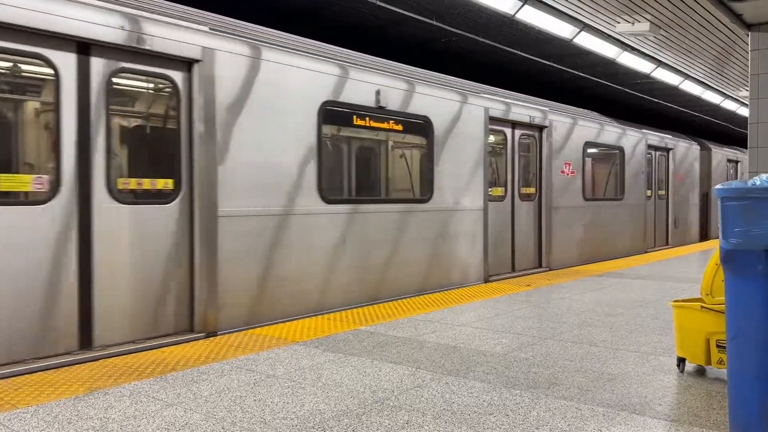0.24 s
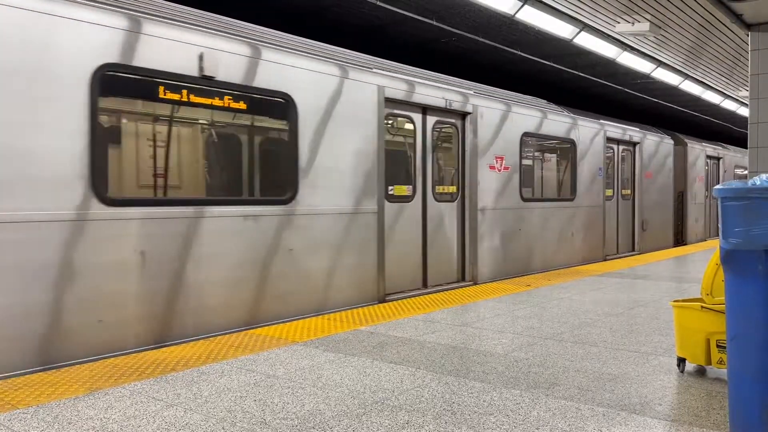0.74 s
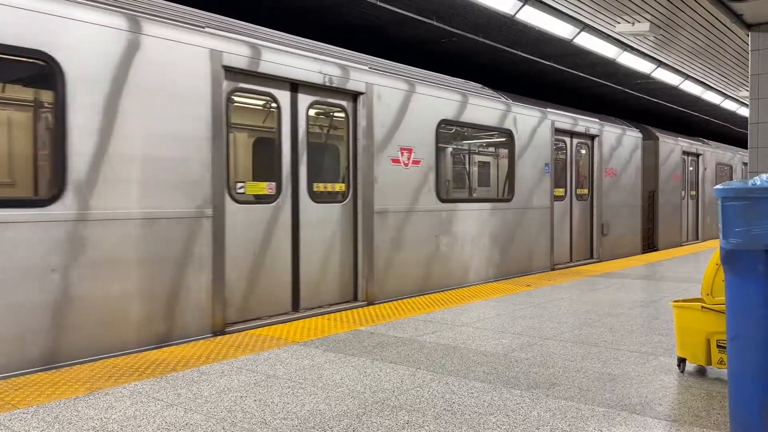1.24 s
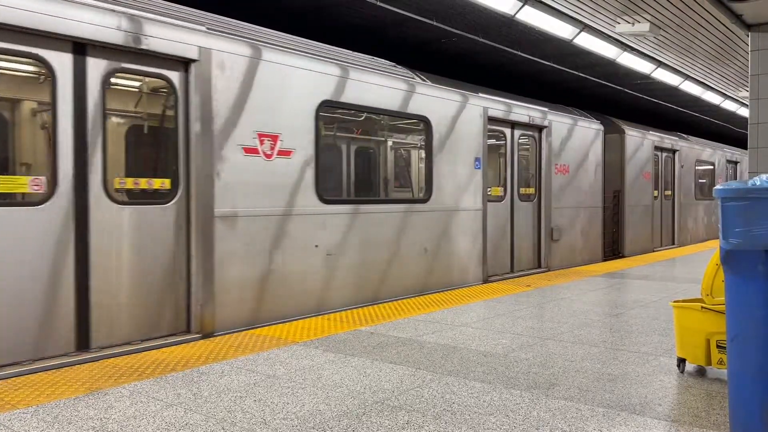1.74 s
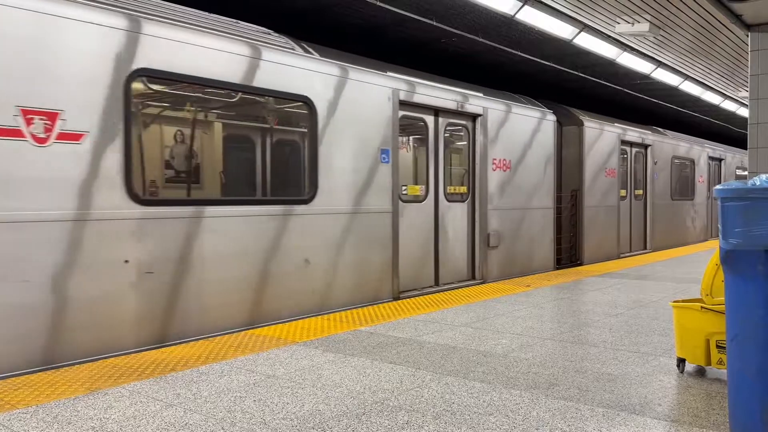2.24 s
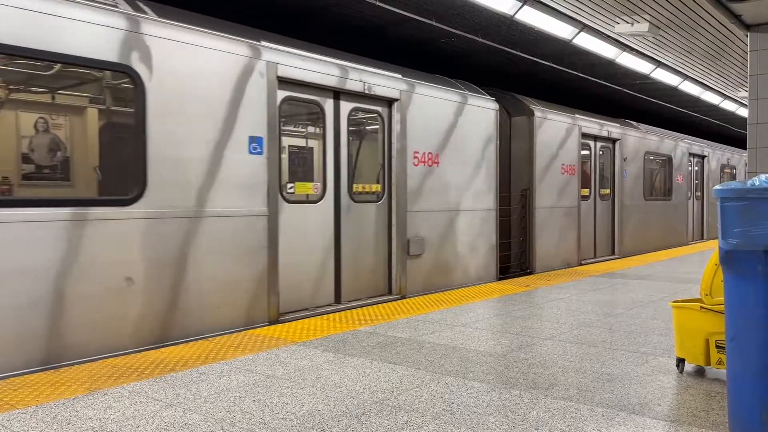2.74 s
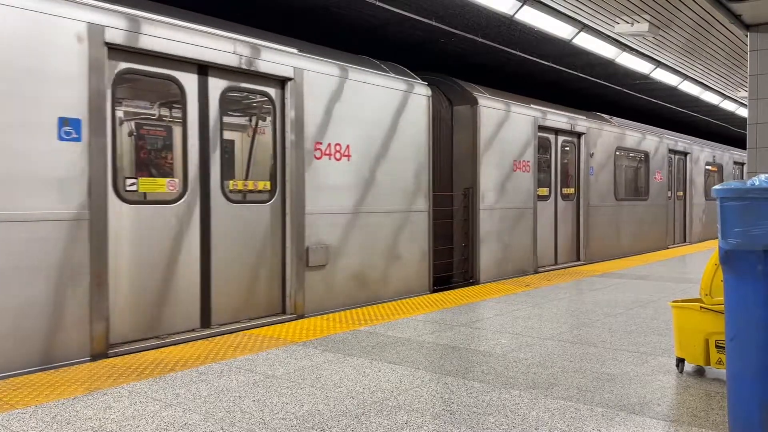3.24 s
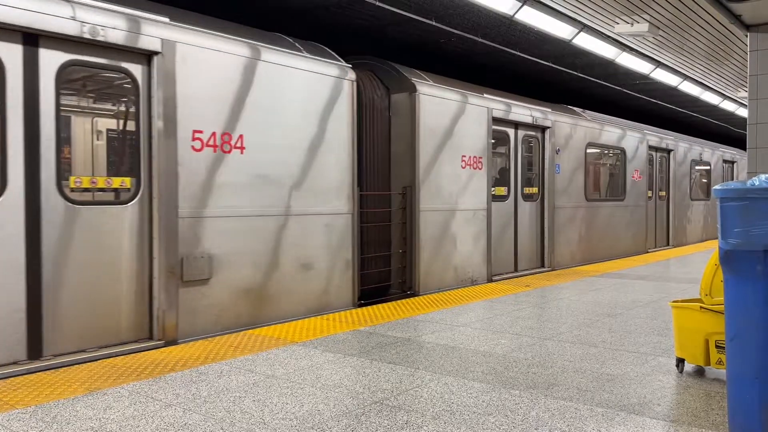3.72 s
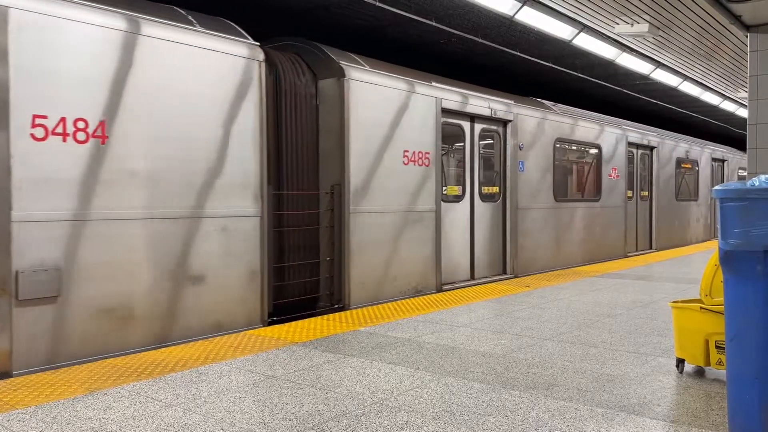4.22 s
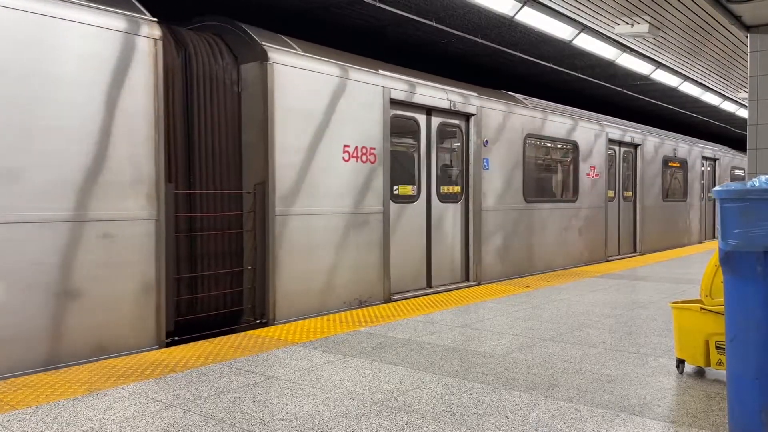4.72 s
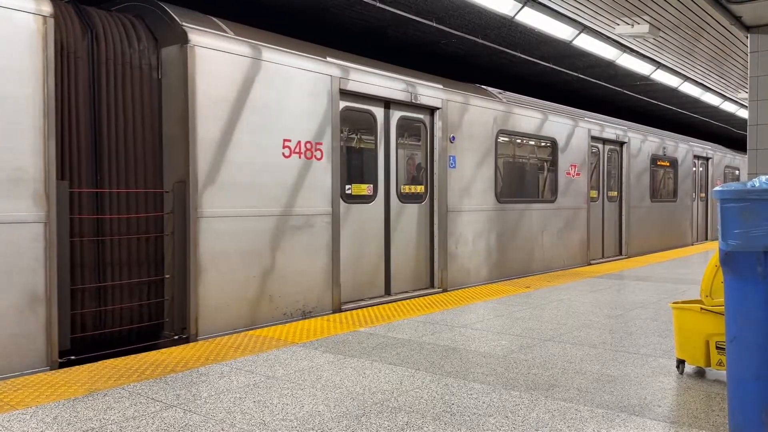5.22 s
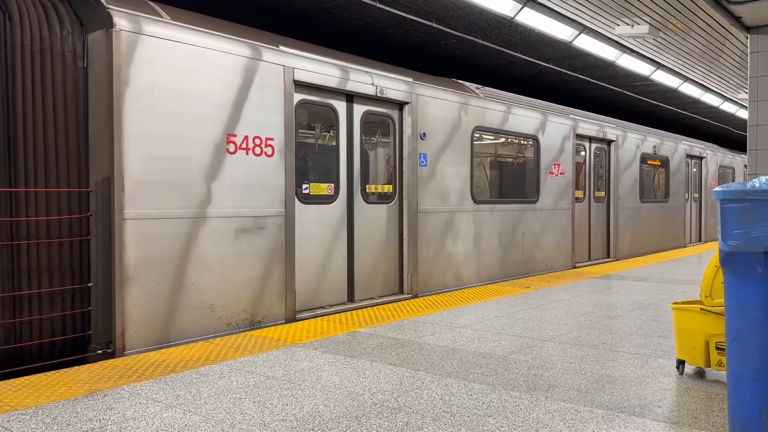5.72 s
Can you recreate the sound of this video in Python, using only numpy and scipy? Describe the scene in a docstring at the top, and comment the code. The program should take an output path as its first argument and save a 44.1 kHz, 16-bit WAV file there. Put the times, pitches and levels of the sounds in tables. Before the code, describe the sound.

A subway train brakes beside an underground platform, heard in wide stereo from a fixed spot close to the cars, with a short hard echo. From 0 s, deep rumble, hum and wheel roar dominate, with brief bass booms as the cars lurch, notably around 0.15, 1.1 and 1.9 s. A pulsing, unsteady electric motor whine cuts out soon after 1 s; a narrow groan swells near 0.9 s. Very high, thin brake squeals waver throughout, joined by a brighter one around 1.8-2.5 s, with short chirps near 2.4 and 3.7 s. After 2.7 s squealing becomes weaker and intermittent, with shrill spells around 3 and after 5 s. Small air puffs begin at 1.5 s and thicken after 4.2 s. A metallic gangway knock comes at 4.16 s, a softer rub swells near 5.7 s. A hollow blower drone rises unevenly late, over faint steady whistles. Rolling noise keeps sinking but never stops by 6 s.

```python
"""Subway train braking at a platform

A train slows evenly to about a third of its speed, and its shaped rolling noise and bass booms sink.
The brakes squeal in thin, wandering tones (sines with overtones) that the station echoes smear.
The traction whine, a cluster of unsteady sines, cuts out after about a second. The gangway between
two cars knocks once and later rubs: noise and ringing plates. A groan, a blower drone, puffs of air
(all shaped noise) and the steady whistles of the converter (sines) join in."""
import sys
import numpy as np
from scipy import signal
from scipy.fft import rfft, irfft, next_fast_len
from scipy.io import wavfile
from scipy.ndimage import uniform_filter1d

SR = 44100
rng = np.random.default_rng(int(sys.argv[2]) if len(sys.argv) > 2 else 0)


def wrap_up_sound(samples):
    """Save the sound to the file named by the first command line argument, as 16-bit audio."""
    columns = np.atleast_2d(samples).T
    # keep every value between -1 and 1, then stretch to whole-number steps
    tamed = np.clip(columns, -1, 1)
    steps = np.round(tamed * 32767).astype(np.int16)
    wavfile.write(sys.argv[1], SR, steps)


N = 263277
TIME = np.arange(N) / SR

STOP_S = 8.85  # the evenly falling speed would reach zero here, after the scene ends
STATION_T60_S = 0.7  # time for the echoes to fall by 60 dB
TRAIN_LAG_S = 0.00043  # sound running along the train reaches the right ear this much later
CUTOFF_HZ = 15750
GROAN_S, GROAN_DB = 0.93, -33.5
LURCH_RISE_DB_PER_S, LURCH_FALL_DB_PER_S = 161, 112
CONVERTER_GROWTH_DB_PER_S = 2.26
CHIRP_RISE_DB_PER_S, OTHER_BOGIE_LEFT_DB = 263, 4
EARS = np.array([[1], [-1]])  # signs for left and right

# Width of the sound field: (frequency [Hz], side minus mid [dB])
WIDTH = [(30, -44), (70, -26), (140, -13.5), (280, -10), (550, -3.5), (1000, 1), (2000, -2), (4500, 0),
         (9000, 6.5), (11500, -30)]
# Balance of the sound field: (frequency [Hz], left minus right [dB])
LEAN = [(60, 1), (400, -0.5), (560, 2.5), (800, 3.5), (1100, 4), (1500, 1), (2500, -1.5), (4500, 0),
        (8000, 1.5)]

# Steady converter tones, level at the end: (frequency [Hz], level [dB])
CONVERTER = [(4000, -59), (5000, -57.5), (7000, -83), (8000, -76), (9000, -75), (9998, -83.5)]
# Colour of the steady air hiss: (frequency [Hz], relative level per Hz [dB])
AIR_HISS = [(5000, -11), (8000, -5), (9500, 4.5), (11500, 8), (13000, -45), (15500, -13)]
# Colour of the valve puffs: (frequency [Hz], relative level per Hz [dB])
PUFF = [(7000, -10.5), (8300, -11.5), (9300, -2.5), (10500, -1), (12000, -15), (13500, -14), (15500, -32)]
# Colour of the puffs' top octave: (frequency [Hz], relative level per Hz [dB])
PUFF_TOP = [(10000, -16), (12200, 2), (14000, -4), (15700, -10)]
# Level of that top octave against the rest: (time [s], relative level [dB])
PUFF_TOP_DB = [(2.5, 6), (4.2, -3), (5.9, -0.5)]
# Air puffs from the brake valves: (start [s], relative level [dB], length [s])
PUFFS = [(1.48, -59.5, 0.05), (1.726, -60.5, .05), (1.965, -66, 0.054), (2.207, -62, 0.066),
         (2.38, -58.5, .054), (2.687, -64, 0.067), (3.083, -65, 0.053), (4.26, -59, 0.039),
         (4.371, -59, .14), (4.661, -58.5, 0.096), (4.956, -58, .039), (5.195, -59, 0.095),
         (5.637, -58, .12), (5.9, -58.5, 0.059)]
# Colour of the undercar blowers: (frequency [Hz], relative level per Hz [dB])
BLOWER = [(215, -18), (262, 6), (310, -7.5), (360, -5.5), (400, 3), (470, -7), (510, 5.5), (560, -17.5),
          (800, -15.5), (1000, -10), (1150, -24), (1400, -18)]
# Blower loudness: (time [s], level [dB])
BLOWER_DB = [(0, -67), (3.5, -59), (4.2, -44.5), (4.65, -47), (4.95, -57), (5.3, -43.5), (5.55, -41.5),
             (5.97, -50.5)]

# Colour of the booming car bodies: (frequency [Hz], relative level per Hz [dB])
BOOM = [(18, -30), (29, -8.5), (36, -21), (44, 6), (51, -22), (60, 5), (70, 3), (79, -9.5), (100, -39)]
# Colour of the underframe hum: (frequency [Hz], relative level per Hz [dB])
HUM = [(60, -38), (79, -10), (94, 2.5), (108, -2), (122, -4), (135, -7.5), (175, -49)]
# Colour of the wheel roar: (frequency [Hz], relative level per Hz [dB])
ROAR = [(100, -68), (137, 1), (160, 1), (180, -1.5), (205, 0.5), (235, -3), (255, -1.5), (295, -5.5),
        (355, -2.5), (420, -5), (490, -9.5), (620, -45)]
# Colour of the rail rush: (frequency [Hz], relative level per Hz [dB])
RUSH = [(380, -33), (510, 1.5), (680, 0), (738, -1), (790, 0), (900, -3), (1000, -6.5), (1150, -3),
        (1280, -12), (1600, -25)]
# Colour of the rubbing brake pads: (frequency [Hz], relative level per Hz [dB])
PAD_HISS = [(900, -8.5), (1330, 1), (1560, 3), (1690, -1), (1810, 1), (2020, 2), (2100, -3), (2200, -2.5),
            (2450, -5), (2850, -6), (3400, -6.5), (3950, -6), (4400, -14.5), (5200, -8.5), (6500, -22),
            (9000, -65)]
# Swells and sags of the rolling noise:
# (centre [s], half-length [s], bass change [dB], roar change [dB], rush change [dB])
SURGES = [(.1, .14, 1, 1.5, 0), (0.654, 0.031, -11, -1, 0), (1.55, 0.083, 4, -2, -1.5),
          (1.77, .035, 1, 0, -3), (1.3, 0.24, 0, 0.5, 1), (2.147, 0.49, 0.5, 1, 1.7),
          (2.519, 0.09, -6, -0.5, -1), (3.04, 0.056, -5.5, 0.5, 1), (3.369, 0.039, -3, -2, -0.5),
          (3.756, 0.043, -8, 0.5, 0.5), (3.95, 0.052, -0.5, -4, 1), (4.152, 0.068, -4.5, -2.5, 0.5),
          (4.395, 0.053, -8, -1, -1.5), (4.544, 0.12, 3, -1, 0.5), (4.806, .035, -5, 0, -0.5)]
# Booms of the lurching car bodies: (peak time [s], level [dB], pitch [Hz])
LURCHES = [(0.15, -28.5, 76), (.34, -30.5, 65.4), (.74, -33, 72), (0.88, -34, 66.7), (1.07, -26.5, 62.7),
           (1.87, -28, 58), (2.31, -36, 60), (3.151, -37, 80), (3.621, -36.5, 88.5), (3.85, -36, 65),
           (4.02, -40, 77.8), (4.71, -36, 79.5), (5.399, -45, 70), (5.66, -38, 77.2), (5.85, -39.5, 77)]
# Narrow resonance of the running gear: (frequency [Hz], relative level per Hz [dB])
GROAN = [(660, -34), (715, -12), (738, 15), (765, -19), (830, -33)]

# Gangway knock, then rub: (peak time [s], level [dB], time to climb the last 12 dB [s],
# body decay [dB/s], bright edge against body [dB], ring against body [dB])
SCUFFS = [(4.158, -43, 0.012, 62, -6.5, 0), (5.68, -48.5, 0.24, 16, -9.5, -6.5)]
# Colour of the scuffs' body: (frequency [Hz], relative level per Hz [dB])
SCUFF_BODY = [(600, 3), (1100, 0), (1450, 3.5), (1700, 1), (1860, 1), (2120, -8), (2500, -11)]
# Colour of the scuffs' bright edge: (frequency [Hz], relative level per Hz [dB])
SCUFF_EDGE = [(2000, -13), (2500, -4), (3200, -1), (3900, -1), (4350, -18), (7000, -21)]
# Ringing gangway plates: (frequency [Hz], relative level [dB], damping [multiple of body decay])
GANGWAY_MODES = [(488, 1, .8), (614, -7, .9), (1095, -6, .7), (1824, -1, 1.1), (3100, -10, 1.7),
                 (3790, -12, 1.5), (3910, -13, 1.5)]

# Low inverter switching tones and sidebands: (frequency [Hz], relative level [dB])
TRACTION_LOW = [(1925, -6.5), (1956, -6.5), (2005, -12.5)]
# High inverter switching tones and sidebands: (frequency [Hz], relative level [dB])
TRACTION_HIGH = [(2768, -6.5), (2870, -5.5), (2910, -4.5), (2957, -3.5), (3065, -8), (3780, -18),
                 (3880, -17), (3990, -20)]
# Pulsing motor whine: (time [s], low tones' level [dB], high tones' level [dB])
WHINE_DB = [(0, -36.5, -37.5), (.07, -36, -37), (.13, -34.5, -38), (.22, -39.5, -37), (.29, -35.5, -40.5),
            (.37, -40.5, -38.5), (.46, -35.5, -39), (.54, -40.5, -38), (.64, -33.5, -37.5),
            (.72, -34.5, -39), (.77, -42, -41), (.83, -39.5, -41), (.95, -47, -44), (1.01, -37.5, -48),
            (1.08, -49, -51), (1.4, -83, -79)]

# Lowest long squeal of a wheel: (time [s], pitch [Hz], level before gain [dB])
SQUEAL_LOW = [(0, 5195, -37.5), (.35, 5230, -38), (.53, 5160, -35.5), (.8, 5183, -35), (1.05, 5180, -34.5),
              (1.35, 5110, -36.5), (1.75, 5136, -38), (2.0, 5330, -41), (2.15, 5230, -49)]
# Main squeal, strongest early on: (time [s], pitch [Hz], level before gain [dB])
SQUEAL_MAIN = [(0, 5428, -29.5), (.15, 5390, -34), (.25, 5442, -31), (.38, 5414, -29), (.46, 5320, -32.5),
               (.55, 5377, -29.5), (.82, 5393, -35), (1.18, 5375, -33.5), (1.28, 5327, -33.5),
               (1.45, 5385, -33), (1.52, 5320, -37), (1.68, 5404, -39), (2.0, 5423, -30),
               (2.12, 5430, -32.5), (2.25, 5430, -29), (2.45, 5435, -33.5), (2.53, 5417, -31.5),
               (2.68, 5450, -32), (2.9, 5530, -43), (3.12, 5465, -44.5), (3.25, 5430, -38),
               (3.44, 5500, -41.5), (3.7, 5520, -62), (3.92, 5460, -73), (4.15, 5450, -57),
               (4.45, 5450, -59), (4.75, 5500, -60)]
# Higher wheel mode that joins in later: (time [s], pitch [Hz], level before gain [dB])
SQUEAL_HIGH = [(1.64, 5850, -45), (1.74, 5844, -43), (1.84, 5917, -31.5), (1.98, 5910, -29),
               (2.07, 5850, -27), (2.11, 5813, -34.5), (2.2, 5794, -29), (2.4, 5803, -36), (2.5, 5776, -32),
               (2.75, 5813, -39), (3.15, 5780, -40), (3.5, 5810, -42), (3.75, 5795, -48), (4.1, 5826, -47),
               (4.33, 5770, -40), (4.6, 5700, -42.5), (4.72, 5680, -38.5), (4.95, 5766, -45.5),
               (5.03, 5750, -37.5), (5.16, 5720, -46), (5.24, 5744, -40), (5.34, 5743, -46),
               (5.41, 5756, -37.5), (5.55, 5740, -46), (5.68, 5720, -41), (5.97, 5700, -51.5)]
# Quieter mode above it: (time [s], pitch [Hz], level before gain [dB])
SQUEAL_TOP = [(2.5, 6000, -46), (2.85, 6080, -52), (3.15, 6110, -48.5), (3.75, 6070, -54.5),
              (4.2, 6025, -57), (4.6, 6094, -51), (4.9, 6100, -48.5), (5.03, 6070, -48), (5.15, 6110, -52),
              (5.25, 6010, -48.5), (5.4, 6120, -54.5), (5.62, 6115, -49), (5.97, 6050, -49)]
# Weak mode that sings only while the train is faster: (time [s], pitch [Hz], level before gain [dB])
SQUEAL_FAINT = [(0, 5760, -36), (.25, 5560, -47), (.43, 5730, -39), (.8, 5630, -45), (1.1, 5610, -43),
                (1.5, 5590, -50), (1.65, 5584, -40), (1.82, 5590, -33.5), (2.05, 5620, -50),
                (2.5, 5730, -55), (3.2, 5640, -51), (3.6, 5580, -49)]
# Mode with a restless pitch: (time [s], pitch [Hz], level before gain [dB])
SQUEAL_RESTLESS = [(1.75, 5970, -47), (1.95, 6030, -47), (2.3, 5870, -43), (2.7, 6060, -47.5),
                   (3.3, 5914, -49.5), (3.85, 5834, -42), (4.0, 5920, -46)]
# Shrill mode that sings in two spells: (time [s], pitch [Hz], level before gain [dB])
SQUEAL_SHRILL = [(2.72, 6800, -58), (2.9, 6830, -44), (3.05, 6820, -41), (3.17, 6820, -42),
                 (3.26, 6830, -42), (3.38, 6850, -43.5), (3.5, 6810, -50), (3.65, 6947, -41),
                 (3.76, 7015, -44), (3.83, 6920, -53), (3.93, 6890, -44), (4.1, 6860, -55),
                 (4.3, 6960, -69), (5.02, 6800, -78), (5.1, 6900, -47), (5.18, 6850, -59),
                 (5.26, 6840, -42), (5.47, 6880, -49), (5.56, 6850, -46), (5.75, 6840, -45.5),
                 (5.97, 6940, -46)]
# Short sliding squeals: (start [s], length [s], pitch [Hz], glide [Hz/s], level [dB],
# overtone setting [dB], fall [dB/s])
CHIRPS = [(2.355, 0.031, 7380, 800, -45, -34, 150), (2.435, 0.24, 7750, 150, -40.5, -18, 70),
          (3.701, 0.042, 5770, 500.5, -33, -32, 200), (3.876, 0.043, 7410, -500, -57, -34, 80),
          (3.956, .05, 6240, -6, -49, -34, 110)]


def from_db(db):
    """Turn decibels into gain."""
    return 10 ** (np.asarray(db) / 20)


def rms_one(x):
    """Scale to unit power."""
    return x / np.sqrt(np.mean(x ** 2) + 1e-20)


def in_time(rows, t=TIME):
    """Read each column of a curve at the times t."""
    seconds, *columns = np.transpose(rows)
    return [np.interp(t, seconds, column) for column in columns]


def at_hz(points, hz):
    """Read a spectrum on a log-frequency axis."""
    f, value = np.transpose(points)
    return np.interp(np.log(hz + 1e-6), np.log(f), value)


def drift(rate, size=N):
    """Slow chance of spread 1 that changes about rate times a second."""
    count, step = 2 ** 13, 64  # slow points, samples between them
    hz = np.fft.rfftfreq(count, step / SR)
    slow = irfft(rfft(rng.standard_normal(count)) / (1 + (hz / rate) ** 2))
    return np.interp(np.arange(size) / step, np.arange(count), rms_one(slow))


def evened(pair):
    """Hold the slow level of a stereo sound at 1; its fast beating stays."""
    power = uniform_filter1d(np.mean(pair ** 2, axis=0), size=SR // 7)
    return pair / np.sqrt(power + 1e-12)


def swell(start, length, rise, fall, t=TIME):
    """Envelope in dB: climbs to 0 at start, holds for length, then dies; rise and fall in dB/s."""
    before = np.maximum(start - t, 0)
    after = np.maximum(t - start - length, 0)
    return -rise * before - fall * after


def speed(t=TIME):
    """Even braking: the speed as a share of its first value."""
    return np.clip(1 - t / STOP_S, 0.05, 1)


def rolling(db, power, flutter_db):
    """Gain of a noise that follows a power of the speed and flutters a little."""
    return from_db(db + flutter_db * drift(7.1)) * speed() ** power


def diffuse_noise(spectrum, lag=TRAIN_LAG_S):
    """Station-filling noise, alike at both ears in the bass, less so higher up; mid rms 1."""
    size = next_fast_len(N, True)
    hz = np.fft.rfftfreq(size, 1 / SR)
    # fade out beyond both ends of the spectrum
    skirt = np.minimum(1, np.minimum(hz / spectrum[0][0], spectrum[-1][0] / (hz + 1))) ** 4
    colour = from_db(at_hz(spectrum, hz)) * skirt
    mid, side = rfft(rng.standard_normal((2, size))) * colour
    width = from_db(at_hz(WIDTH, hz))
    balance = from_db(EARS * at_hz(LEAN, hz) / 2)
    delay = np.exp(1j * np.pi * EARS * hz * lag)  # right ear late by lag seconds
    pair = irfft((mid + EARS * width * side) * balance * delay, size)[:, :N]
    return pair / np.std(pair.mean(0))


def station(ear_lag_count, direct):
    """Echo response: direct path and echoes along the train reach the right ear some samples late."""
    t = TIME[:SR]
    echoes = rng.standard_normal((3, SR)) * from_db(-60 * t / STATION_T60_S)
    echoes /= np.sqrt(np.sum(echoes ** 2, axis=1, keepdims=True))
    along = echoes[2] + direct * (t == 0)
    # the first two echo trains come from all round, one for each ear
    response = echoes[:2] + 0.62 * np.array([along, np.roll(along, ear_lag_count)])
    return rfft(response, next_fast_len(N + SR, True))


def wavering(pitch_hz, waver_hz, rate):
    """Phase of a tone with bounded unsteady pitch; starts a second early so the station rings."""
    early = np.pad(pitch_hz + np.zeros(N), (SR, 0), mode="edge")
    waver = waver_hz * 2 * np.tanh(drift(rate, size=N + SR) / 2)
    return 2 * np.pi * np.cumsum(early + waver) / SR


def smeared(tone, hall):
    """Reflections of earlier pitches beat with the present one."""
    size = next_fast_len(N + SR, True)
    echoed = irfft(rfft(tone, size) * hall, size)
    return evened(echoed[:, SR:SR + N])


def converter():
    """Steady whistles draw near, fading in and out at each ear as the cars move through echoes."""
    out = np.zeros((2, N))
    distance_db = CONVERTER_GROWTH_DB_PER_S * (TIME - TIME[-1])
    for hz, db in CONVERTER:
        for ear, lag in zip(out, (0, TRAIN_LAG_S)):
            gain = from_db(db + 3 + distance_db + 1.2 * drift(5))  # 3 dB: sine peak over its rms
            phase = 2 * np.pi * hz * (TIME - lag) + 0.35 * drift(5)
            ear += gain * np.sin(phase)
    return out


def air():
    """Valve puffs open quickly, hold and die in the station, over a faint steady hiss."""
    power = 0
    for start, db, length in PUFFS:
        opening = np.clip((TIME - start) / 0.02, 0, 1)
        after = np.maximum(TIME - start - length, 0)
        # a fast closing and a weaker, slow tail
        closing = from_db(-260 * after) + from_db(-9.5 - 14 * after)
        power = power + (opening * from_db(db) * closing) ** 2
    top_db, = in_time(PUFF_TOP_DB)
    colour = diffuse_noise(PUFF, lag=0) + from_db(top_db) * diffuse_noise(PUFF_TOP, lag=0)
    puffs = np.sqrt(power) * colour
    return from_db(-69.5) * diffuse_noise(AIR_HISS, lag=0) + from_db(-2.5) * puffs


def blower():
    """A hollow drone of shaped noise that grows, unevenly, as the end of the car comes close."""
    level_db, = in_time(BLOWER_DB)
    return from_db(level_db) * diffuse_noise(BLOWER, lag=0)


def running_noise():
    """Car bodies boom, underframe hums, wheels roar, rails rush and pads rub, fading with speed."""
    surge_db = 0
    for centre, half, *db in SURGES:
        surge_db = surge_db + np.outer(db, np.exp(-((TIME - centre) / half) ** 2))
    bass_gain, roar_gain, rush_gain = from_db(surge_db)
    boom = rolling(db=-37.5, power=0.49, flutter_db=-1.5) * evened(diffuse_noise(BOOM))
    hum = rolling(db=-36.5, power=0.37, flutter_db=0.3) * evened(diffuse_noise(HUM, lag=0.00038))
    roar = rolling(db=-31, power=1.34, flutter_db=0.5) * diffuse_noise(ROAR, lag=0.00018)
    rush = rolling(db=-37, power=1.57, flutter_db=0.5) * diffuse_noise(RUSH, lag=0.00027)
    rub = rolling(db=-47, power=0.52, flutter_db=1) * diffuse_noise(PAD_HISS)
    return bass_gain * (boom + hum) + roar_gain * roar + rush_gain * rush + rub


def lurches():
    """Each lurch sets a car body booming briefly at a low, unsteady pitch."""
    out = 0
    for peak_s, db, hz in LURCHES:
        gain = from_db(db + swell(peak_s, 0, LURCH_RISE_DB_PER_S, LURCH_FALL_DB_PER_S))
        phase = wavering(hz, waver_hz=5.8, rate=19.6)[SR:]
        out = out + gain * np.sqrt(2) * np.sin(phase)
    return out


def groan():
    """One narrow resonance of the running gear sounds faintly at speed and swells once."""
    once = from_db(GROAN_DB + swell(GROAN_S, 0, rise=160, fall=240))
    faint = rolling(db=-48, power=2.4, flutter_db=-0.5)
    return (once + faint) * evened(diffuse_noise(GROAN))


def gangway(hall):
    """A knock or rub is a rasp, its bright edge dying twice as fast as its body, and ringing plates."""
    body = edge = 0
    rings = np.zeros((len(GANGWAY_MODES), N))
    _, mode_db, damping = np.transpose(GANGWAY_MODES)[:, :, None]
    for peak_s, db, rise_s, decay, edge_db, ring_db in SCUFFS:
        shape_db = swell(peak_s, 0, 12 / rise_s, decay)
        body = body + from_db(db + shape_db)
        edge = edge + from_db(db + edge_db + 2 * shape_db)
        rings += from_db(db + ring_db + mode_db + damping * shape_db)
    plates = 0
    for gain, mode in zip(rings, GANGWAY_MODES):
        tone = np.sin(wavering(mode[0], waver_hz=13.42, rate=45.5))
        plates = plates + gain * smeared(tone, hall)
    return body * diffuse_noise(SCUFF_BODY) + edge * diffuse_noise(SCUFF_EDGE) + plates


def traction(hall):
    """Motors whine at the inverter's tones until electric braking ends; high tones waver more."""
    low_db, high_db = in_time(WHINE_DB)
    low = sum(from_db(db) * np.sin(wavering(hz, waver_hz=14.16, rate=34))
              for hz, db in TRACTION_LOW)
    high = sum(from_db(db) * np.sin(wavering(hz, waver_hz=28.25, rate=31.7))
               for hz, db in TRACTION_HIGH)
    return from_db(low_db) * smeared(low, hall) + from_db(high_db) * smeared(high, hall)


def squeal(pitch_hz, level_db, hall, waver_hz, octave_db):
    """Stick-slip locks onto one mode of wheel and pad; its pitch is less steady at speed."""
    unrest = speed(np.arange(-SR, N) / SR) ** 0.6
    # the grit of the pad adds fast jitter
    grit = 0.27 * unrest ** 2 * drift(125, size=N + SR)
    phase = wavering(pitch_hz, waver_hz * unrest, rate=31) + grit
    # hard slipping distorts the vibration: the overtones grow faster than the tone
    slip_db = np.pad(level_db, (SR, 0), mode="edge") + 30.5
    third_fits = 3 * np.max(pitch_hz) < SR / 2
    harmonics = np.sin(2 * phase) + from_db(-19) * np.sin(3 * phase) * third_fits
    overtones = from_db(octave_db + 0.73 * slip_db) * harmonics
    grip = from_db(1.3 * drift(26) - 0.2)
    return from_db(level_db) * grip * smeared(np.sin(phase) + overtones, hall)


def long_squeal(curve, hall, waver_hz, octave_db, gain_db):
    """A mode that sings on, gliding, and stops quickly at both ends."""
    pitch_hz, level_db = in_time(curve)
    start, end = curve[0][0], curve[-1][0]
    gate_db = swell(start, end - start, rise=300, fall=170)
    return squeal(pitch_hz, level_db + gain_db + gate_db, hall, waver_hz, octave_db)


def brakes(hall):
    """Several wheels sing; shrill tones come more directly, from another bogie on the left."""
    other_bogie = station(ear_lag_count=19, direct=0.56)
    shrill = long_squeal(SQUEAL_SHRILL, other_bogie, waver_hz=41.7, octave_db=-12, gain_db=-4)
    for start, length, hz, glide, db, octave_db, fall in CHIRPS:
        # the pitch slides from a tenth of a second before the hold to a tenth after it
        pitch_hz = hz + glide * np.clip(TIME - start, -0.1, length + 0.1)
        level_db = db + swell(start, length, CHIRP_RISE_DB_PER_S, fall)
        shrill = shrill + squeal(pitch_hz, level_db, other_bogie, waver_hz=34, octave_db=octave_db)
    return (long_squeal(SQUEAL_LOW, hall, waver_hz=58, octave_db=-17.5, gain_db=1)
            + long_squeal(SQUEAL_MAIN, hall, waver_hz=49.86, octave_db=-24, gain_db=2.5)
            + long_squeal(SQUEAL_HIGH, hall, waver_hz=54.13, octave_db=-26.5, gain_db=4)
            + long_squeal(SQUEAL_TOP, hall, waver_hz=48.56, octave_db=-38, gain_db=8)
            + long_squeal(SQUEAL_FAINT, hall, waver_hz=72, octave_db=-21, gain_db=0.5)
            + long_squeal(SQUEAL_RESTLESS, hall, waver_hz=76, octave_db=-30, gain_db=5)
            + shrill * from_db(EARS * OTHER_BOGIE_LEFT_DB / 2))


def scene():
    """The train as heard from the platform."""
    hall = station(ear_lag_count=19, direct=0.19)
    background = converter() + air() + blower()
    train = running_noise() + lurches() + groan() + gangway(hall)
    return background + train + traction(hall) + brakes(hall)


def record(dry):
    """A steep low-pass filter removes the very top of the treble."""
    low_pass = signal.ellip(12, 0.1, 90, CUTOFF_HZ, fs=SR, output="sos")
    return signal.sosfilt(low_pass, dry)


dry = scene()
out = record(dry)
wrap_up_sound(out)
```